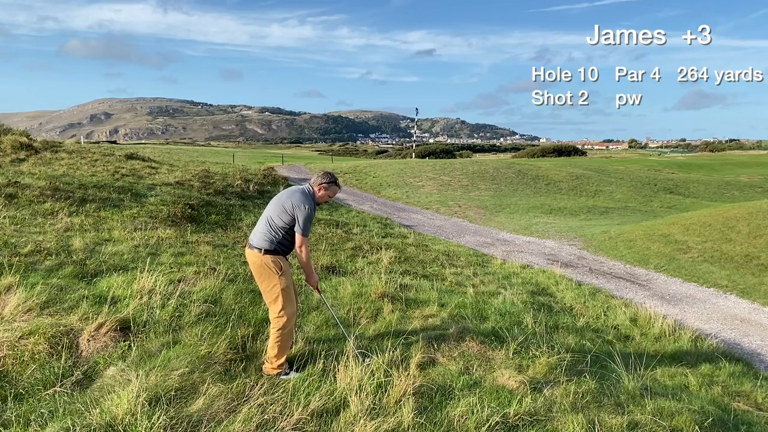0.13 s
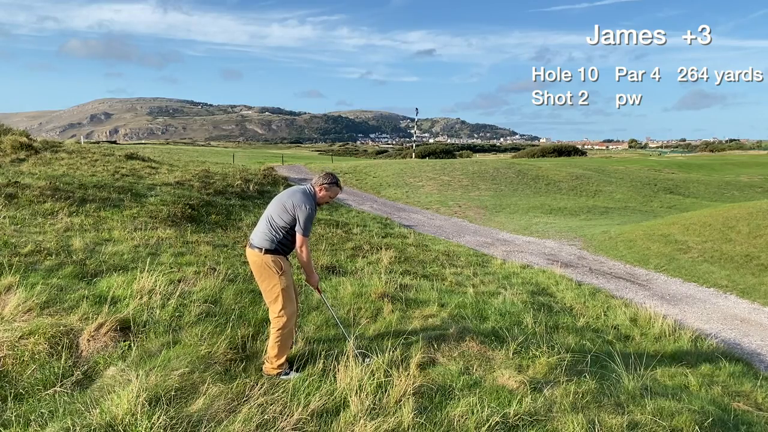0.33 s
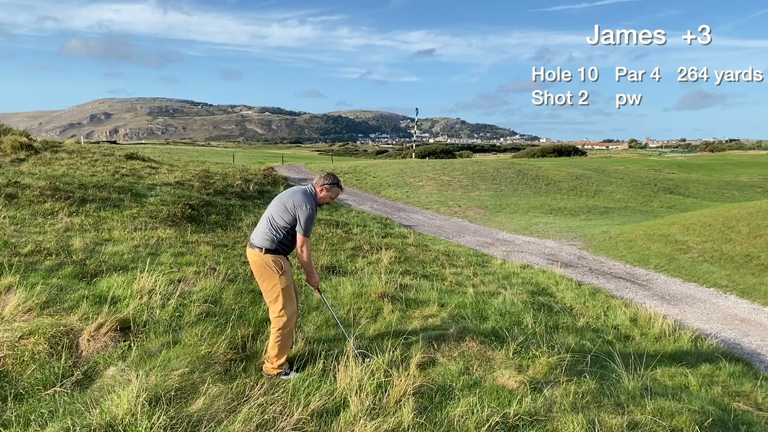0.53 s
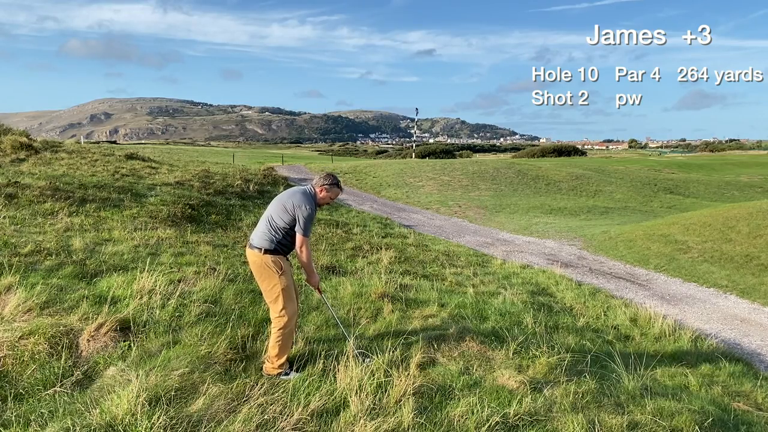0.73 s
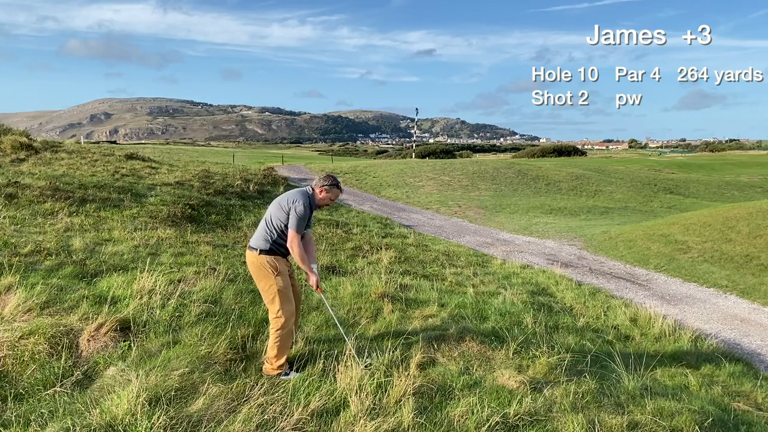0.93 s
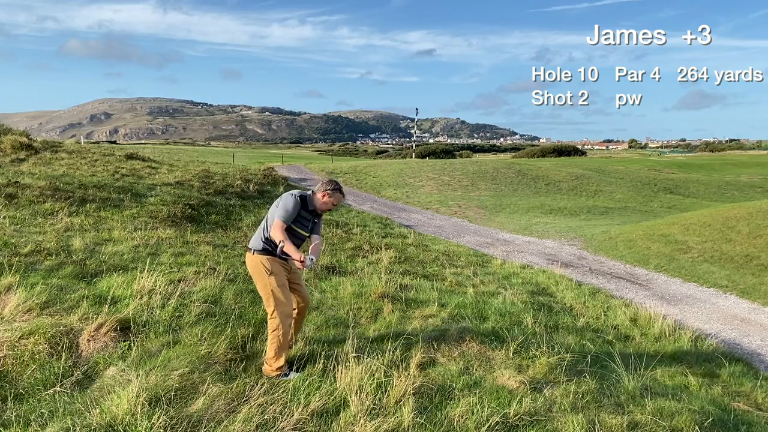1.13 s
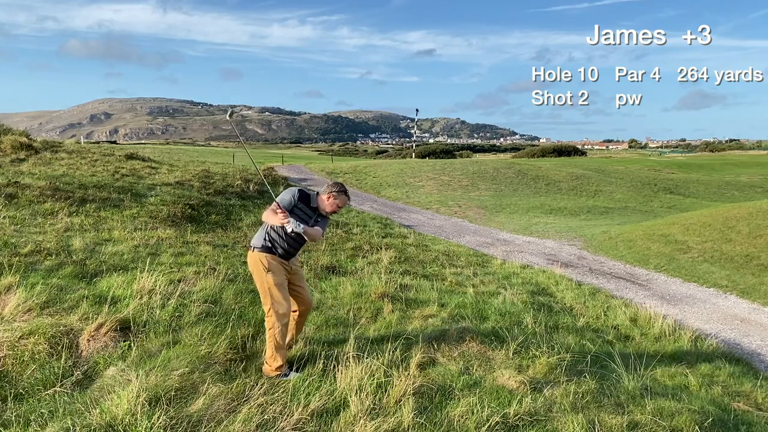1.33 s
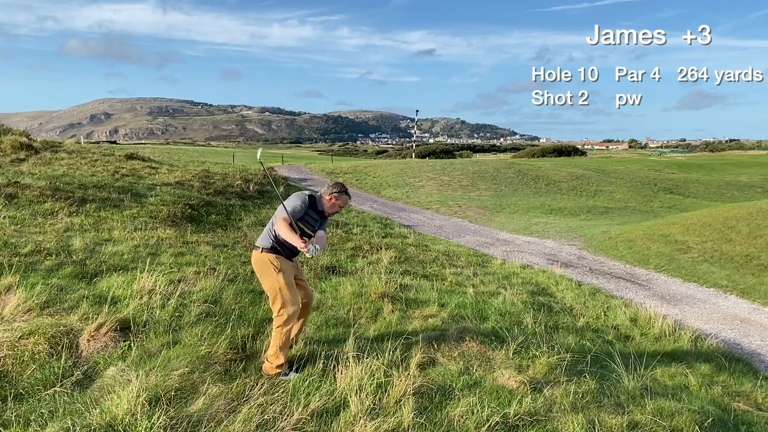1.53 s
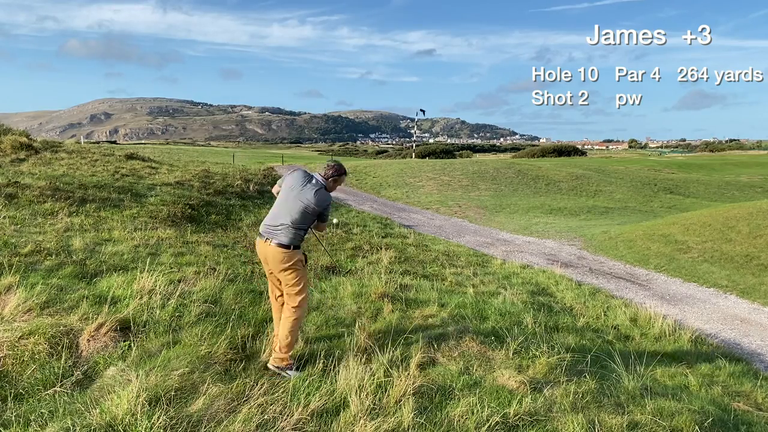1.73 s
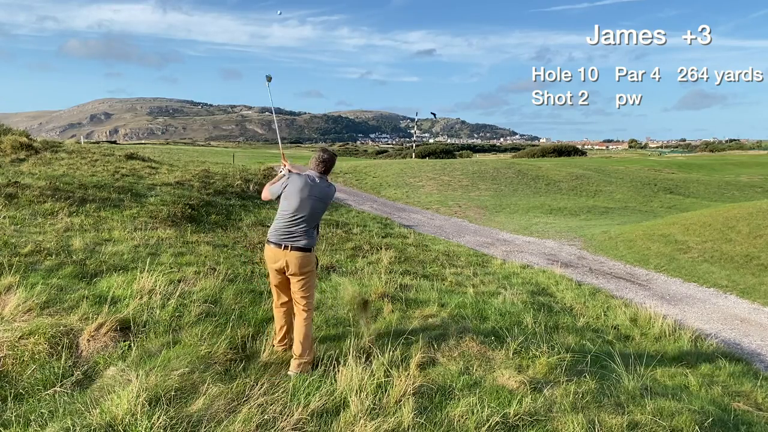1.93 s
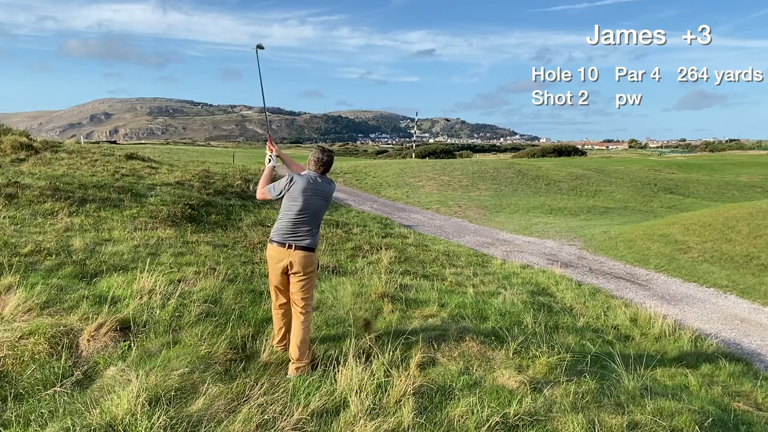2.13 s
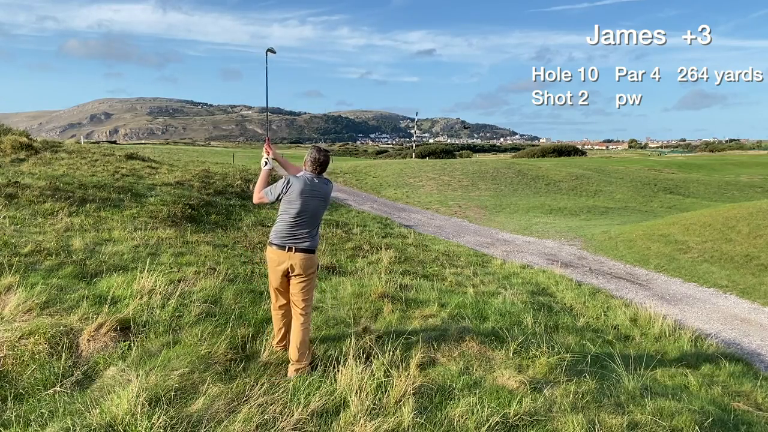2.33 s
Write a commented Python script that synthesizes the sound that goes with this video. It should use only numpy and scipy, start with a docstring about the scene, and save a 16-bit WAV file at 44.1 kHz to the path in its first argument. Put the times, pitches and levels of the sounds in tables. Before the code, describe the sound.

A golf club swishes through thick grass and strikes the ball with one sharp crack.

```python
"""Light wind on the microphone, a distant rush and a low, wavering hum: an open golf course.
Close by, an iron brushes thick grass on the way back, swishes down shedding eddies, tears through
the stems, knocks the ball and thumps the turf. Torn grass rustles down after it and the ground
answers faintly. Far off comes one hoarse call, perhaps a crow."""
import sys
import numpy as np
from scipy import signal
from scipy.fft import rfft, irfft, next_fast_len
from scipy.io import wavfile
from scipy.ndimage import map_coordinates

SR = 44100
rng = np.random.default_rng(int(sys.argv[2]) if len(sys.argv) > 2 else 0)


def wav_out(sig):
    """Save sig, one row per channel (or a flat mono array), as 16-bit PCM at SR to the path in sys.argv[1]."""
    wavfile.write(sys.argv[1], SR, np.round(np.clip(np.atleast_2d(sig).T, -1, 1) * 32767).astype(np.int16))


N = 109323
DEEPEST_S, STRIKE_S = 1.7364, 1.7377  # bottom of the swing; the face meets the ball


def amp(db):
    """Decibels to gain."""
    return 10 ** (np.asarray(db) / 20)

def unit(x):
    """Scale to rms 1."""
    return x / np.sqrt(np.mean(x ** 2) + 1e-20)

def clock():
    """Time of every sample."""
    return np.arange(N) / SR

def wobble(rate):
    """A smooth random curve, rate knots a second."""
    return map_coordinates(rng.standard_normal(int(N * rate / SR) + 4), [clock() * rate])

def contour(points):
    """Gain through (t/s, level/dB) points."""
    return amp(np.interp(clock(), *np.transpose(points)))

def colour(x, points):
    """Causal filter of unit energy through (f/Hz, level/dB) points."""
    size = 2 * next_fast_len(N)
    hz, db = np.transpose(points)
    log_hz = np.log(np.fft.rfftfreq(size, 1 / SR) + 1)
    cepstrum = irfft(np.log(amp(np.interp(log_hz, np.log(hz + 1), db))))
    cepstrum[1:size // 2] *= 2  # fold for minimum phase
    cepstrum[size // 2 + 1:] = 0
    response = np.exp(rfft(cepstrum))
    return irfft(rfft(x, size) * response / np.sqrt(np.mean(np.abs(response) ** 2)))[:N]

def noise(points):
    """Coloured noise of rms 1."""
    return unit(colour(rng.standard_normal(N), points))

def grains(points, per_s, spread_db):
    """A dense crackle of tiny snaps of uneven size, rms 1."""
    hits = (rng.random(N) < per_s / SR) * np.sign(rng.standard_normal(N))
    sizes = amp(spread_db * np.clip(rng.standard_normal(N), -2, 2))
    return unit(colour(hits * sizes, points))

def dying(start, t60):
    """A sudden start and an exponential decay."""
    t = clock() - start
    return (t >= 0) * np.exp(-np.log(1000) * np.abs(t) / t60)

def ring(start, hz, t60):
    """A decaying sine."""
    return dying(start, t60) * np.sin(2 * np.pi * hz * (clock() - start))

def passing_db(rise_db_per_s, fall_db_per_s, round_s=.0046):
    """Level rising to the bottom of the swing, rounding over and falling."""
    t = clock() - DEEPEST_S
    return -np.where(t < 0, rise_db_per_s, fall_db_per_s) * (np.hypot(t, round_s) - round_s)

def swells(rows, attack_s, release_s):
    """Envelope of held stretches with soft edges."""
    t = clock()
    return sum(amp(db) * np.exp(-np.maximum(start - t, 0) / attack_s - np.maximum(t - end, 0) / release_s)
               for start, end, db in rows)


# Gusts at the microphone: t/s, level/dB
GUSTS = [(0, -49), (.15, -51.5), (.35, -43.5), (.6, -49.5), (.8, -53), (1.3, -56), (1.6, -53), (1.8, -48),
         (2.0, -49.5), (2.25, -55), (2.45, -41.5)]
# Their rumble: f/Hz, relative level/dB
WIND_SPECTRUM = [(2, 8.5), (5, 2), (10, -7), (20, -17.5), (40, -19.5), (80, -27.5), (140, -47), (400, -80)]
def wind():
    """The breeze buffets the microphone."""
    return contour(GUSTS) * noise(WIND_SPECTRUM)

# Background far across the course: f/Hz, relative level/dB
RUSH_SPECTRUM = [(59, -35.5), (100, -3), (140, -12), (223, -6), (370, -6), (411, -5), (477, -7.5),
                 (564, -6), (742, -4), (843, -0.5), (936, -2.5), (1160, -6), (3250, -28), (15500, -34)]
def distant_rush():
    """A nearly steady wash from far away."""
    return amp(-64 + .48 * wobble(3)) * noise(RUSH_SPECTRUM)

# Swell and fade of the background hum: t/s, relative level/dB
HUM_SWELL = [(0, 1.5), (.3, 0), (.6, -1), (.85, -5), (1.2, -2), (1.5, 2.5), (1.85, 1), (2.0, 5), (2.15, 0),
             (2.4, -7)]
def low_hum(hz=59.4):
    """A low, wavering hum swells and fades."""
    tone = unit(np.sin(2 * np.pi * hz * clock() + .8 * wobble(12)))
    return amp(-67.5 + 2.5 * wobble(14)) * contour(HUM_SWELL) * tone

# Backswing through the grass nearby: start t/s, end t/s, level/dB
BRUSHES = [(.876, .948, -69.5), (.982, 1.045, -67.3)]
# Brushed blades: f/Hz, relative level/dB
BLADE_SPECTRUM = [(500, -20), (2000, -3), (4000, 2.5), (8000, 4), (11000, 4), (15500, -2.5)]
def backswing():
    """The club brushes the blades twice, setting off tiny ticks."""
    return swells(BRUSHES, attack_s=.015, release_s=.024) * grains(BLADE_SPECTRUM, 9000, spread_db=5.5)

# Air round the passing club, body and hiss: f/Hz, relative level/dB
AIR_BODY = [(100, -24), (250, -12), (400, -2), (800, -3.5), (1600, -15.5), (3000, -15.5), (6000, -33),
            (12000, -60)]
AIR_HISS = [(500, -19), (2800, 10), (4500, -1.5), (9000, -12.5), (12000, -28), (15000, -45)]
def swish(start_s=1.662, onset_s=.012, brightening=2.1):
    """Once fast enough, the head sheds eddies, louder and brighter with speed."""
    speed_db = passing_db(rise_db_per_s=152, fall_db_per_s=490)
    onset = (1 + np.tanh((clock() - start_s) / onset_s)) / 2
    body = amp(speed_db) * noise(AIR_BODY)
    hiss = amp(-2 + brightening * speed_db) * noise(AIR_HISS)
    return amp(-49.5) * onset * (body + hiss)

# Grass tearing at the ball: f/Hz, relative level/dB
TEAR_SPECTRUM = [(100, -10), (300, -8), (450, -7.5), (650, -2.5), (1300, -2.5), (2200, -3.5), (3200, -2),
                 (4800, -3), (6000, -2.5), (8500, -1.5), (12500, -6), (15500, -11.5)]
def tearing(enter_s=1.7098):
    """The head enters the grass and tears stems by the hundred."""
    level_db = -27 + passing_db(rise_db_per_s=1130, fall_db_per_s=930)
    return (clock() > enter_s) * amp(level_db) * grains(TEAR_SPECTRUM, 11000, spread_db=2)

# Thick stems near the ball: t/s, level/dB, f/Hz
STEM_SNAPS = [(1.7247, -18, 3500), (1.7368, -15.5, 6500), (1.7417, -20.5, 1510), (1.7504, -23, 9500),
              (1.8295, -48, 2800), (1.8670, -36.5, 1870), (1.9050, -48.5, 9060), (1.9190, -43, 2190)]
def stem_snaps():
    """A few stems snap alone, each a very short ping."""
    return sum(amp(db) * ring(start, hz, t60=.002) for start, db, hz in STEM_SNAPS)

# A short knock near 1 kHz and faint pings colouring the hit: f/Hz, relative level/dB, t60/s
STRIKE_TONES = [(1067, -2, 0.0037), (1419, -29.5, .04), (1745, -29, .035), (1938, -28, .03),
                (2740, -30, .035), (3220, -30.5, 0.049), (5820, -30, 0.04), (6152, -31, 0.051),
                (8580, -35, 0.044)]
# Thump of the turf: f/Hz, relative level/dB
TURF_SPECTRUM = [(25, -24), (60, 3), (110, -1.5), (200, -12), (400, -18.5), (700, -28), (3000, -63.5)]
def strike(contact_s=.0005):
    """The ball squashes on the face with a grass-cushioned knock and a crack; the sole thumps the turf."""
    squash = 1 - np.exp(-np.abs(clock() - STRIKE_S) / contact_s)
    knock = squash * sum(amp(db) * ring(STRIKE_S, hz, t60) for hz, db, t60 in STRIKE_TONES)
    crack = dying(STRIKE_S, t60=.003) * rng.uniform(-.9, 1, N)
    thud = dying(STRIKE_S, t60=.11) * noise(TURF_SPECTRUM)
    return amp(-2.5) * knock + amp(-21.5) * crack + amp(-43.5) * thud

# Showers of torn grass nearby: start t/s, end t/s, level/dB
SHOWERS = [(1.76, 1.845, -67), (1.862, 1.92, -63), (1.94, 2.05, -77.5)]
# Their rustle: f/Hz, relative level/dB
RUSTLE_SPECTRUM = [(300, -11.5), (900, -2.5), (1500, 3), (3000, -0.5), (6000, -3.5), (10000, -5),
                   (15500, -13)]
def clippings():
    """Torn grass flies and lands in a fine patter."""
    return swells(SHOWERS, attack_s=.012, release_s=.01) * grains(RUSTLE_SPECTRUM, 4100, spread_db=4)

def ground_echo(x):
    """The open slopes scatter a short, dull tail back to the microphone."""
    tail = dying(0, t60=.26) * noise([(100, -7.5), (1000, -2.5), (2500, -4), (12000, -19.5)])
    return signal.fftconvolve(x, tail / np.linalg.norm(tail))[:N]

# Resonances of the call, far off: peak t/s, half-length/s, f/Hz, width/Hz, level/dB
CALL_RESONANCES = [(2.33, .009, 640, 90.04, -62), (2.352, .016, 1437, 259.6, -59),
                   (2.362, .009, 986, 89.76, -55), (2.393, .009, 727, 150, -65)]
def far_call():
    """One hoarse call: narrow resonances swell one after another."""
    t = clock()
    call = np.zeros(N)
    for peak_s, half_s, hz, width, db in CALL_RESONANCES:
        roughness = wobble(width) + 1j * wobble(width)
        band = unit(np.real(roughness * np.exp(2j * np.pi * hz * t)))
        call += amp(db) * band / (1 + ((t - peak_s) / half_s) ** 2)
    return call

def scene():
    """One microphone near the golfer, the open course behind."""
    outdoors = wind() + distant_rush() + low_hum()
    stroke = backswing() + swish() + tearing() + stem_snaps() + strike() + clippings()
    return (outdoors + stroke + amp(-37.5) * ground_echo(stroke) + far_call())[None]

def record(dry, top_hz=15850, taper_hz=250):
    """The recorder keeps nothing above its band limit."""
    size = 2 * next_fast_len(N)
    ramp = np.clip((top_hz - np.fft.rfftfreq(size, 1 / SR)) / taper_hz, 0, 1)
    return irfft(rfft(dry, size) * np.sin(np.pi / 2 * ramp) ** 2, size)[:, :N]


dry = scene()
out = record(dry)
wav_out(out)
```